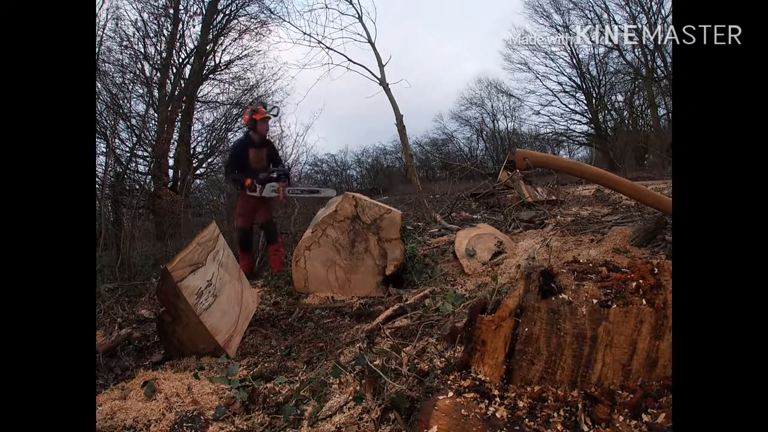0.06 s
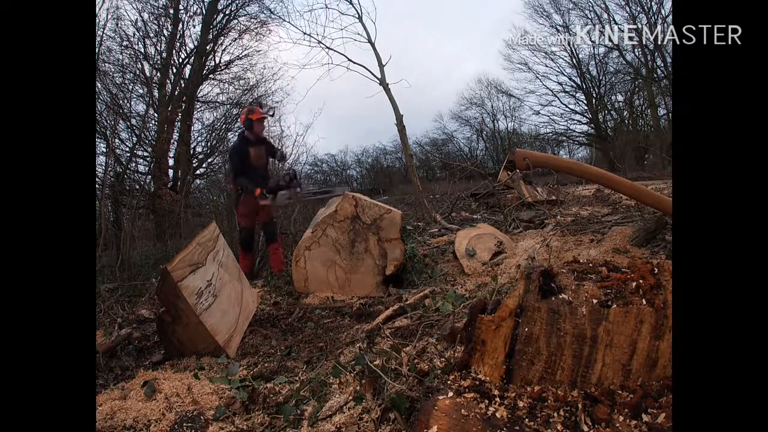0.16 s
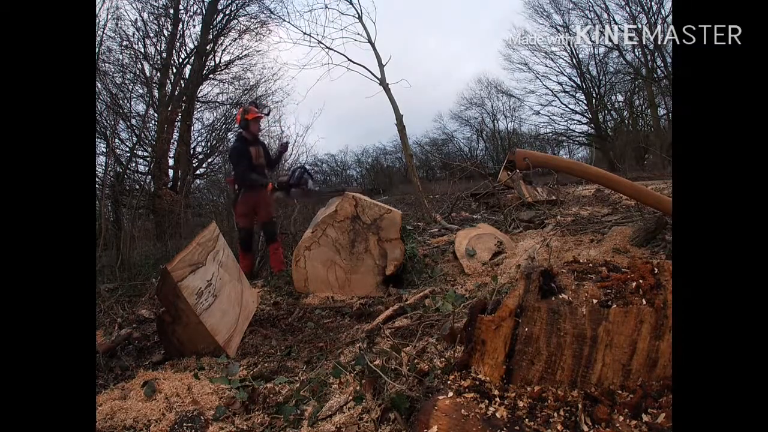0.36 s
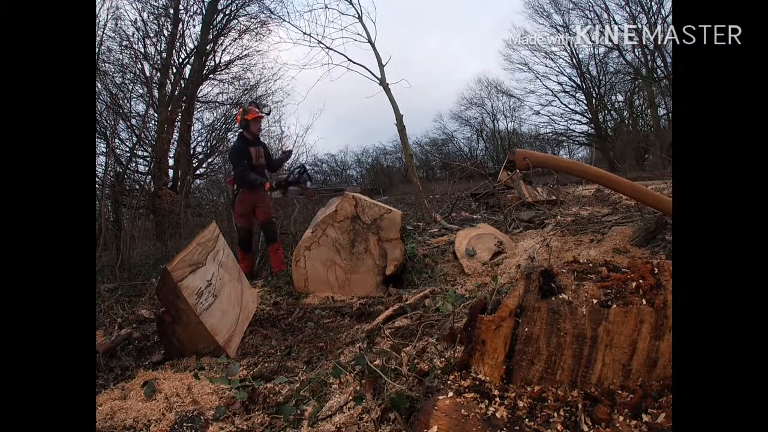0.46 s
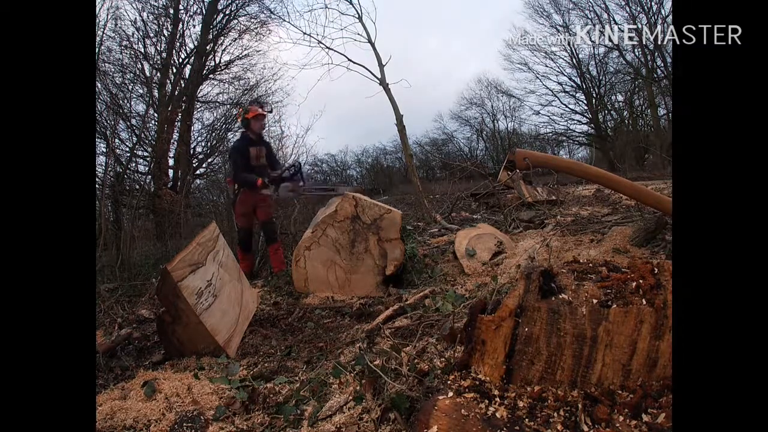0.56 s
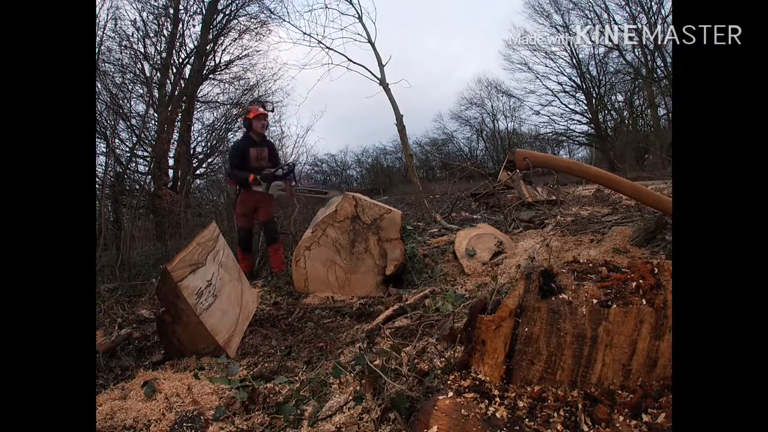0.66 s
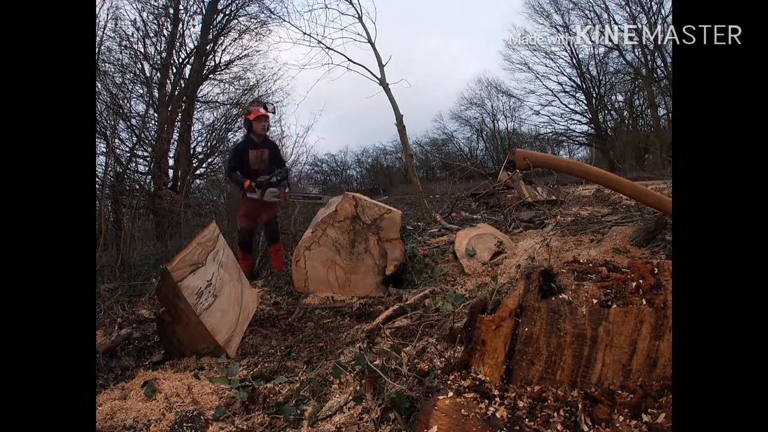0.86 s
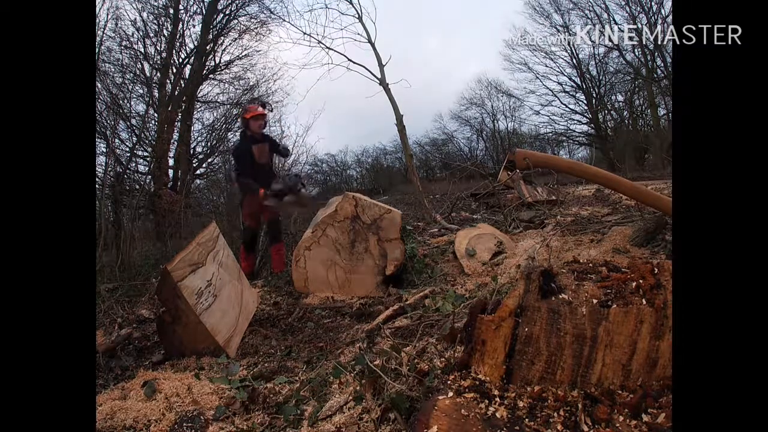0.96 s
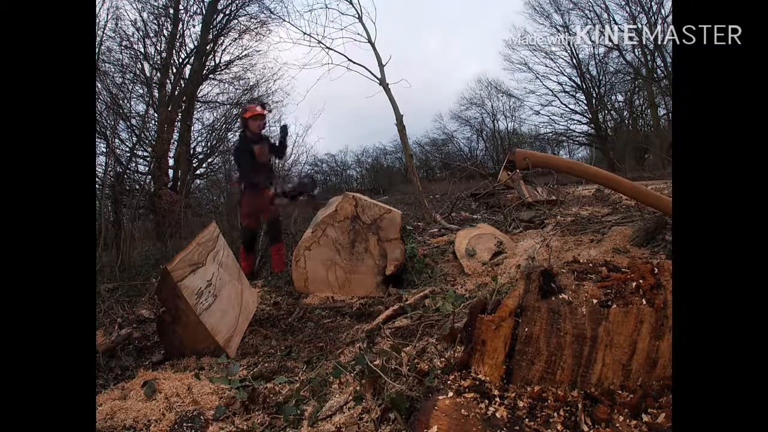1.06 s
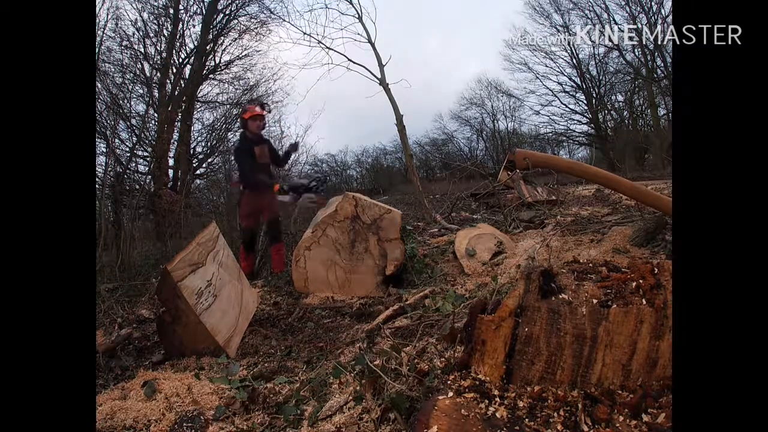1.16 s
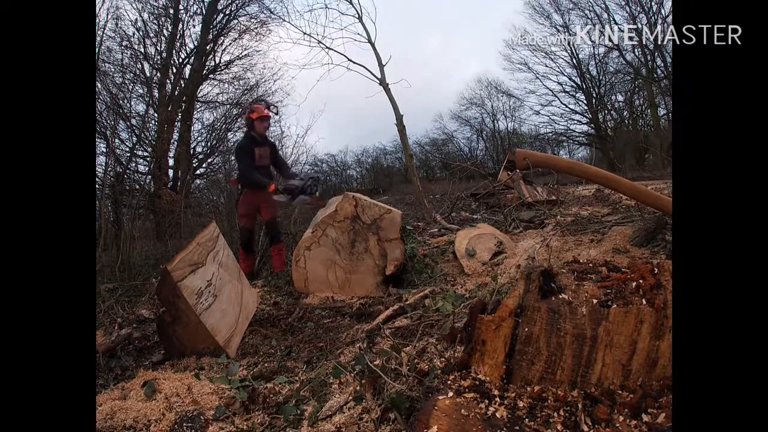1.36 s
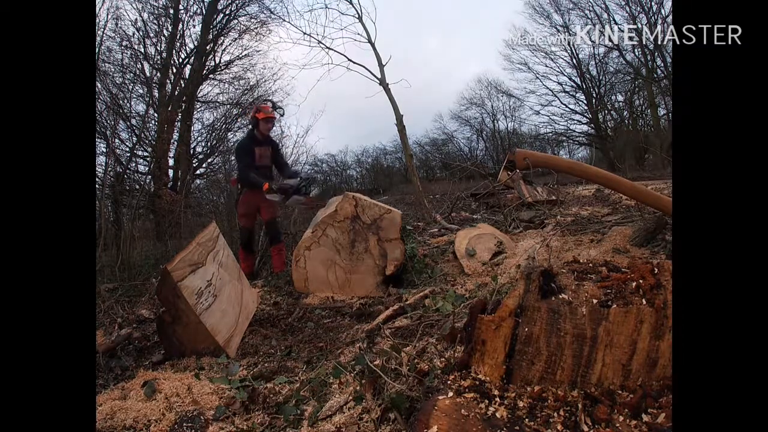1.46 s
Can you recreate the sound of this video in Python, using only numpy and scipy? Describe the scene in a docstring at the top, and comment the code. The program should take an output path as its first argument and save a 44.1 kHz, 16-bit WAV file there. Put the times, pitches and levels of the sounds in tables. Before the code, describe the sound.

A chainsaw's starter cord is pulled twice, clacking and puffing outdoors without the engine catching

```python
"""Over a low rumble and a far hiss, a chainsaw ticks and thuds softly as it is handled in a clearing.
Its starter cord is pulled: the pawls clack in with a squeak, then the piston gulps and puffs five times
through the ringing muffler while the cord rasps out, and the starter knocks as the cord stops.
More ticks and soft thuds follow, then a second pull with five more puffs; the saw does not catch.
Hits ring decaying modes, noise is coloured and enveloped, and the saw scatters faintly off the trunks."""
import sys
import numpy as np
from scipy import signal
from scipy.fft import rfft, irfft
from scipy.io import wavfile

SR = 44100
rng = np.random.default_rng(int(sys.argv[2]) if len(sys.argv) > 2 else 0)


def transcribe(signal):
    """Save signal, clipped to [-1, 1], as a 16-bit WAV file at the path in sys.argv[1]."""
    frames = np.atleast_2d(signal).T
    limited = np.clip(frames, -1, 1)
    pcm = np.round(limited * 32767).astype(np.int16)
    wavfile.write(sys.argv[1], SR, pcm)


N = 66150  # 1.5 s
TIME = np.arange(N) / SR


def amp(db):
    """Decibels to gain."""
    return 10 ** (np.asarray(db) / 20)


def unit(x):
    """Scale to rms 1."""
    return x / np.sqrt(np.mean(x ** 2) + 1e-20)


def level(curve):
    """Gain over time, drawn in straight dB lines between (t/s, level/dB) points."""
    times, db = np.transpose(curve)
    return amp(np.interp(TIME, times, db))


def colour(x, points):
    """Weight a steady signal's spectrum by (f/Hz, level/dB) points on a log-frequency axis; rms 1."""
    hz, db = np.transpose(points)
    f = np.maximum(np.fft.rfftfreq(N, 1 / SR), 1)
    gain = amp(np.interp(np.log(f), np.log(hz), db))
    return unit(irfft(rfft(x) * gain, N))


def soften(x, hz, order=2):
    """Low-pass: takes the edge off above the cutoff."""
    lowpass = signal.butter(order, min(hz, SR / 2 - 1), fs=SR, output="sos")
    return signal.sosfilt(lowpass, x + 1e-18)


def wander(rate):
    """Random motion of spread 1, low-passed at the rate in Hz."""
    motion = soften(rng.standard_normal(2 * N), rate)
    return unit(motion[N:])  # the first half lets the filter settle


def clicks(times, gains):
    """One impulse at each time."""
    samples = (np.asarray(times) * SR).astype(int)
    return np.bincount(samples, gains, N)[:N]


def ring(x, hz, t60):
    """A resonant mode: a unit click starts a decaying cosine of height 1."""
    r = amp(-60 / (t60 * SR))  # decay per sample
    w = 2 * np.pi * hz / SR
    return signal.lfilter([1, -r * np.cos(w)], [1, -2 * r * np.cos(w), r * r], x + 1e-18)


def bursts(rows, attack_s):
    """Envelope of quick linear rises and exponential decays."""
    out = np.zeros(N)
    for s, db, decay in rows:
        age = np.maximum(TIME - s, 0)
        rise = np.minimum(age / attack_s, 1)
        fall = np.exp(-np.maximum(age - attack_s, 0) / decay)
        out += amp(db) * rise * fall
    return out


def grains(per_s):
    """Random tiny contacts of uneven size."""
    return (rng.random(N) < per_s / SR) * rng.standard_normal(N)


def swell(s, length):
    """Envelope of a chatter: quick rise, hold, quick fall."""
    rise_s, fall_s = 0.0036, 0.002  # exponential time constants
    rise = np.minimum(TIME - s, 0) / rise_s
    fall = np.maximum(TIME - s - length, 0) / fall_s
    return np.exp(rise - fall)


# far hiss, spectrum: f/Hz, relative level/dB
HISS_COLOUR = [(180, -6), (300, -4), (430, -10.5), (750, -4), (1100, -6.5), (1560, -9), (2250, -17),
               (2700, -20), (3750, -29), (5000, -34), (6200, -41), (7400, -57), (9000, -49.5), (10500, -71),
               (12500, -62.5), (15500, -86.5)]
# far hiss, loudness: t/s, level/dB
HISS_LEVEL = [(0, -37.5), (.25, -35.5), (.55, -40), (.8, -37), (1.05, -36.5), (1.5, -39)]
# low rumble, spectrum: f/Hz, relative level/dB
RUMBLE_COLOUR = [(15, -2), (30, -2), (55, -5), (80, 2.5), (115, -5), (165, 1.5), (225, -6.5), (320, -24.5),
                 (600, -32.5), (2000, -88)]
RUMBLE_DB, RUMBLE_LUMP_DB = -32, 1.9  # rms level, spread of the lumps


def background():
    """Coloured noise makes a far hiss and a low rumble whose level wanders in lumps."""
    hiss = colour(rng.standard_normal(N), HISS_COLOUR) * level(HISS_LEVEL)
    lumps = amp(RUMBLE_LUMP_DB * wander(rate=20))
    rumble = unit(colour(rng.standard_normal(N), RUMBLE_COLOUR) * lumps)
    return hiss + amp(RUMBLE_DB) * rumble


ECHO_DB, ECHO_T60_S, ECHO_DELAY_S = -21.5, 0.24, 0.012


def clearing(x):
    """Logs and trunks scatter the saw into a faint decaying tail of random reflections."""
    reflections = soften(grains(per_s=1300), hz=5100) * (TIME > ECHO_DELAY_S)
    tail = reflections * np.exp(-np.log(1000) * TIME / ECHO_T60_S)
    return amp(ECHO_DB) * signal.fftconvolve(x, tail / np.linalg.norm(tail))[:N]


# light ticks of the loose chain: t/s, level/dB, decay/s
TICKS = [(.022, -42.5, 0.0015), (.060, -49.5, .002), (.148, -51, 0.0078), (.226, -43.5, .002),
         (.609, -50, 0.0046), (.665, -49.5, 0.0027), (.699, -46.5, 0.0041), (.730, -45.5, .003),
         (.767, -50, 0.0026), (1.017, -54, 0.0025), (1.343, -35.5, 0.0048)]
# tick spectrum: f/Hz, relative level/dB
TICK_COLOUR = [(1500, 4.5), (4500, -14.5), (5800, 4.5), (6500, 0.5), (7400, -9.5), (8800, -15),
               (10500, -26.5), (14000, -18.5), (16000, -21)]


def chain_ticks():
    """The loose chain ticks: tiny bursts of coloured noise."""
    return colour(rng.standard_normal(N), TICK_COLOUR) * bursts(TICKS, attack_s=0.00035)


# dull thuds of handling: t/s, hit level/dB, deep boom level relative to the hit/dB
THUDS = [(0.227, -32, 12.5), (.250, -30, -1), (0.566, -20.5, -6.5), (0.629, -30, 3), (0.696, -30, 8),
         (0.77, -28, -19), (0.824, -36, 8), (0.96, -24.5, -27), (1.099, -20, -30), (1.28, -20.5, -18),
         (1.328, -22.5, -15)]
# body modes of a thud: f/Hz, level relative to the hit/dB, t60/s
THUD_MODES = [(142.9, -1, 0.028), (172, 7.5, 0.049), (247, -22, 0.013)]
BOOM_HZ, BOOM_T60_S, THUD_SOFT_HZ = 59, 0.24, 250


def handling_thuds():
    """Moving the saw thumps its low modes and a deep, slower-dying boom, dulled by a low-pass."""
    s, db, boom_db = np.transpose(THUDS)
    thuds = sum(ring(clicks(s, amp(db + mode_db)), hz, t60) for hz, mode_db, t60 in THUD_MODES)
    boom = ring(clicks(s, amp(db + boom_db)), BOOM_HZ, BOOM_T60_S)
    return soften(thuds + soften(boom, 2 * BOOM_HZ), THUD_SOFT_HZ, order=4)


# gritty scuffs of cord, chain and handles: t/s, level before low-pass/dB, decay/s, low-pass f/Hz
SCUFFS = [(0.2735, -29.5, 0.0096, 8900), (0.3175, -28.5, 0.0077, 10400), (0.336, -33, 0.0111, 5040),
          (0.3671, -32.5, 0.0064, 11100), (.387, -27.5, 0.011, 3640), (0.4437, -37.5, 0.0065, 7000),
          (0.661, -31, 0.0097, 2830), (1.084, -26.5, 0.014, 9300), (1.123, -29.5, 0.019, 4500),
          (1.1597, -27, 0.011, 8810), (1.2022, -24.5, 0.009, 12100), (1.222, -32.5, 0.0054, 5000),
          (1.358, -40.5, 0.008, 5000)]
# scuff spectrum before the low-pass: f/Hz, relative level/dB
SCUFF_COLOUR = [(300, 0), (1500, 8), (3500, 5.5), (4800, -1), (6000, -1), (7500, -13.5), (9000, -10.5),
                (10500, -24.5), (13000, -12.5), (16000, -34)]
SCUFF_ATTACK_S, SCUFF_GRAINS_PER_S, SCUFF_GRAIN_DB = 0.0045, 1500, -4.5  # grains relative to the noise


def scuffs():
    """Rubbing surfaces give short bursts of noise and tiny contacts, each with its own brightness."""
    contacts = amp(SCUFF_GRAIN_DB) * unit(grains(SCUFF_GRAINS_PER_S))
    grit = colour(rng.standard_normal(N) + contacts, SCUFF_COLOUR)
    out = 0
    for s, db, decay, bright_hz in SCUFFS:
        burst = grit * bursts([(s, db, decay)], SCUFF_ATTACK_S)
        out = out + soften(burst, bright_hz, order=4)
    return out


# cord's rasp before flutter, loud in each pull and faint between: t/s, level/dB
CORD_LEVEL = [(0, -48), (.27, -50), (.295, -29.5), (.34, -31), (.39, -28.5), (.415, -43), (.45, -35),
              (.50, -56.5), (.58, -49.5), (1.05, -63), (1.085, -32.5), (1.125, -35), (1.175, -28.5),
              (1.225, -40), (1.255, -33), (1.31, -44), (1.365, -39), (1.40, -67), (1.5, -54)]
# rasp spectrum: f/Hz, relative level/dB
CORD_COLOUR = [(300, 11), (900, 1.5), (1300, -13), (2700, 2), (3300, -13), (4200, -17), (4800, -16.5),
               (5800, -11.5), (7500, -27.5), (10000, -33), (16000, -37.5)]
CORD_GRAINS_PER_S, CORD_GRAIN_DB = 4000, -22.5  # grains relative to the noise
CORD_FLUTTER_DB = 4  # spread


def cord():
    """The cord rasps through its guide: noise and fine grains with a fluttering level."""
    contacts = amp(CORD_GRAIN_DB) * unit(grains(CORD_GRAINS_PER_S))
    friction = rng.standard_normal(N) + contacts
    flutter = amp(CORD_FLUTTER_DB * wander(rate=44))
    return colour(friction, CORD_COLOUR) * level(CORD_LEVEL) * flutter


# pawls clack in: t/s, hit level/dB, chatter length/s, low-pass f/Hz, housing pitch factor
PAWLS = [(.2780, -17, 0.0076, 4440, 1.005), (1.0897, -15.5, 0.0086, 4500, .998)]
SQUEAK_HZ, SQUEAK_WAVER_HZ = 2062, 59.7  # centre, spread
SQUEAK_DB = 1.5  # relative to the pawls' hit level


def squeak():
    """The pawls stick and slip as they bite: a very short tone of wavering pitch."""
    pitch_hz = SQUEAK_HZ + SQUEAK_WAVER_HZ * wander(rate=330)
    tone = np.sin(2 * np.pi * np.cumsum(pitch_hz) / SR)
    grip = 0
    for s, db, length, _, _ in PAWLS:
        grip = grip + amp(db + SQUEAK_DB) * swell(s, length) * (TIME > s)
    return tone * soften(grip, hz=400)


# knocks as the cord stops and rewinds: t/s, hit level/dB, chatter length/s, low-pass f/Hz, pitch factor
KNOCKS = [(.4497, -20, 0.002, 4500, 1.04), (.480, -32.5, 0.0058, 6500, 1.1),
          (1.2712, -16.5, 0.0038, 2550, 1.01)]
# starter housing modes: f/Hz, t60/s, level under the pawls/dB, level under a knock/dB
HOUSING = [(517.6, 0.05, -4, -11), (1010, 0.015, -7, -1), (1540, 0.023, -6.5, -2),
           (1893, 0.021, -14.5, -5.5), (2062, 0.044, -6, -6.5), (2248, 0.017, -5, -7),
           (2680, 0.024, -6.5, -16.5), (3320, 0.033, -22, -16), (3537, .035, -19, -14),
           (3930, 0.01, -15, -10.5), (5028, 0.025, -24, -16.5), (6700, 0.024, -34, -40)]
CHATTER_PER_S, CHATTER_DB = 2500, -13.5  # contacts, level relative to the hit


def starter(rows, mode_db):
    """A hit inside a brief chatter of contacts rings the housing."""
    out, contacts = 0, grains(CHATTER_PER_S)
    for s, db, length, bright_hz, pitch in rows:
        chatter = amp(CHATTER_DB) * swell(s, length) * contacts
        force = amp(db) * soften(clicks([s], [1]) + chatter, bright_hz)
        for k, (hz, t60, _, _) in enumerate(HOUSING):
            sign = (-1) ** k  # neighbouring modes in opposite polarity
            out = out + sign * amp(mode_db[k]) * ring(force, hz * pitch, t60)
    return out


# piston puffs: t/s, push level/dB, lead of the intake gulp/s, gulp level relative to the puff/dB,
# bark level offset/dB, bark pitch factor
PUFFS = [(0.3124, -13, 0.00415, -5.5, 2, 1.09), (0.3417, -12, 0.0049, -4.5, -1, 1.02),
         (0.3629, -21, 0.0043, 3.5, 4, 0.82), (0.3937, -13.5, 0.0061, -5, -1, 0.81),
         (0.4218, -16, 0.0065, -12.5, -4.5, 0.81), (1.1345, -12, 0.00625, -7.5, -5, 1.02),
         (1.1555, -14.5, 0.00446, -13, 0, 0.98), (1.1791, -12, 0.004, -8, 1, 1.02),
         (1.1968, -15, .005, -14, -1, .98), (1.2227, -12, 0.0048, -7.5, -2, 0.92)]
# muffler modes before the bark offsets: f/Hz, level/dB, t60/s
MUFFLER = [(89, -9, 0.045), (169.4, 5, 0.063), (266, -5.5, 0.023), (404, -10.5, 0.037), (469, 0.5, 0.026),
           (620, -28, 0.013)]
BARK_ABOVE_HZ, PUFF_SOFT_HZ = 350, 629.6


def piston():
    """Each stroke gulps, then puffs; both ring the muffler, whose upper modes bark at a varying pitch."""
    out = 0
    for s, db, lead, gulp_db, bark_db, pitch in PUFFS:
        push = clicks([s, s - lead], amp([db, db + gulp_db]))
        for hz, mode_db, t60 in MUFFLER:
            if hz > BARK_ABOVE_HZ:
                hz, mode_db = hz * pitch, mode_db + bark_db
            out = out - amp(mode_db) * ring(push, hz, t60)
    return soften(out, PUFF_SOFT_HZ, order=5)


def scene():
    """The saw and its scatter in the clearing, over the background."""
    _, _, pawl_db, knock_db = np.transpose(HOUSING)
    handling = chain_ticks() + handling_thuds()
    pull = scuffs() + cord() + squeak() + starter(PAWLS, pawl_db) + starter(KNOCKS, knock_db)
    saw = handling + pull + piston()
    return (background() + clearing(saw) + saw)[None]


def record(dry):
    """The deepest bass is rolled off and the top is cut steeply."""
    highpass = signal.butter(2, 18, "high", fs=SR, output="sos")
    lowpass = signal.ellip(10, 0.1, 80, 15750, fs=SR, output="sos")  # ripple dB, stopband dB, edge Hz
    return signal.sosfilt(lowpass, signal.sosfilt(highpass, dry))


dry = scene()
out = record(dry)
transcribe(out)
```